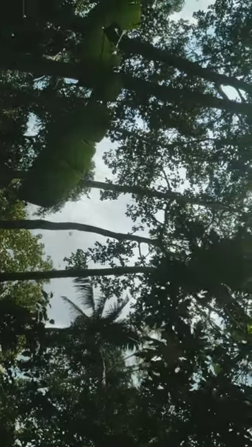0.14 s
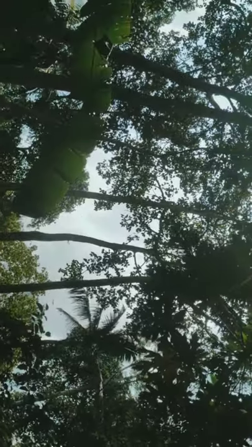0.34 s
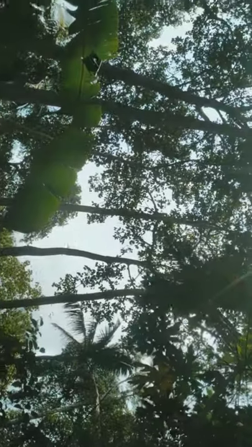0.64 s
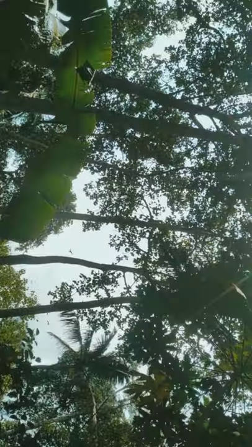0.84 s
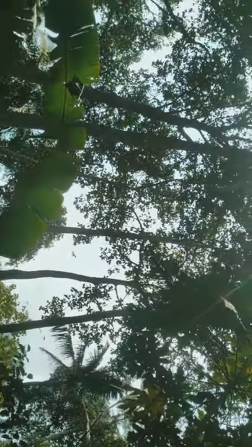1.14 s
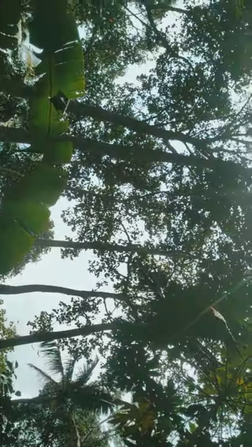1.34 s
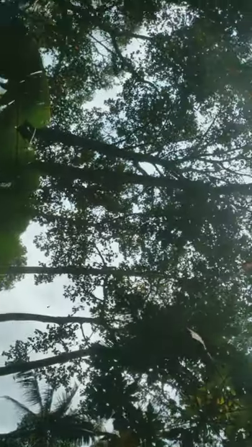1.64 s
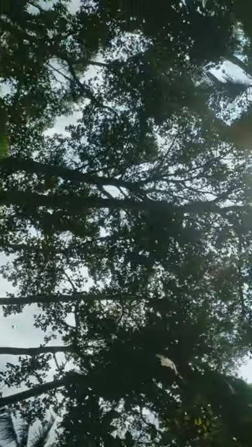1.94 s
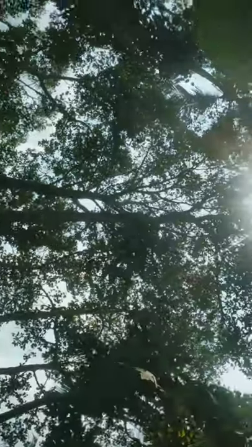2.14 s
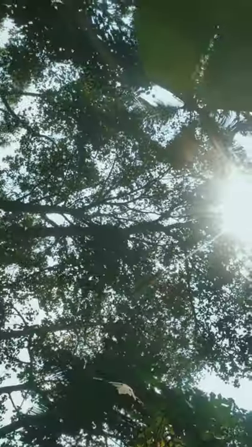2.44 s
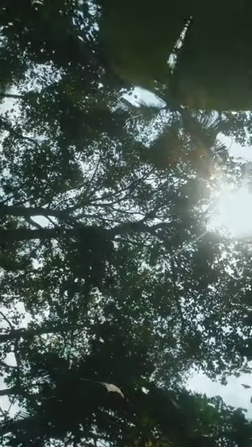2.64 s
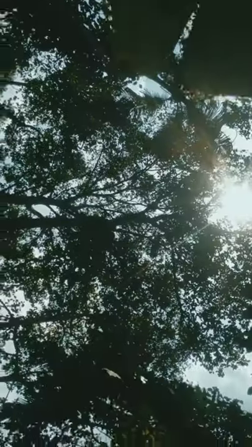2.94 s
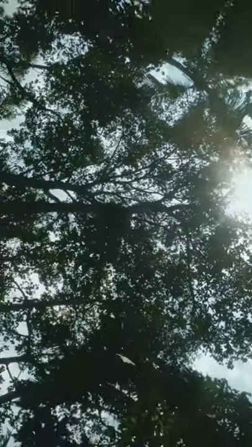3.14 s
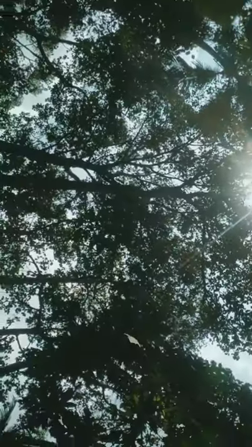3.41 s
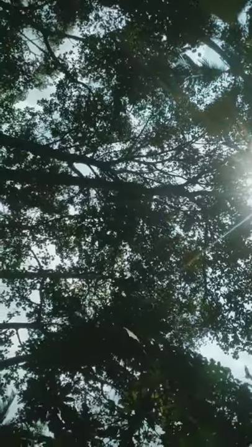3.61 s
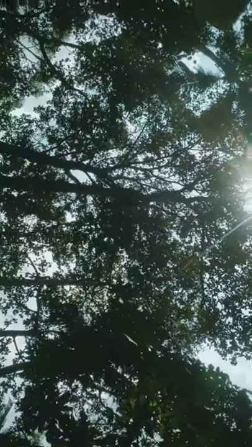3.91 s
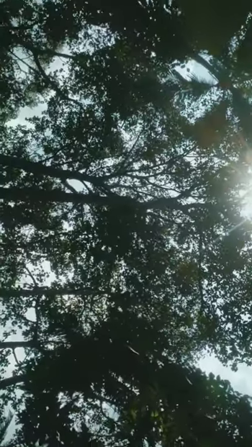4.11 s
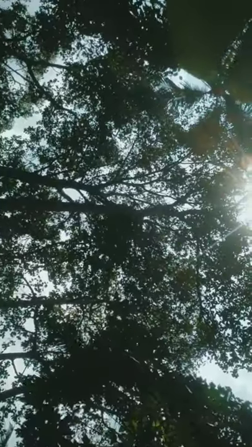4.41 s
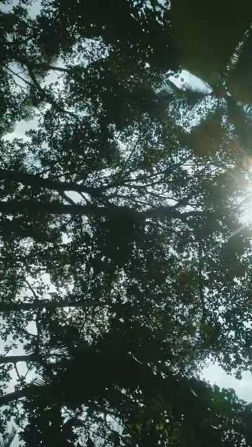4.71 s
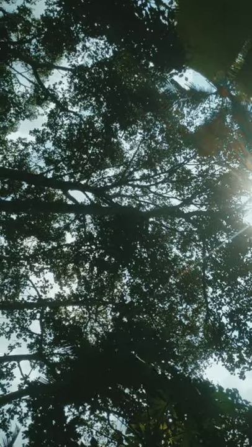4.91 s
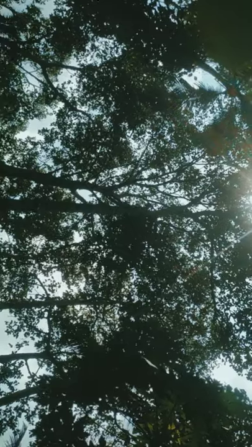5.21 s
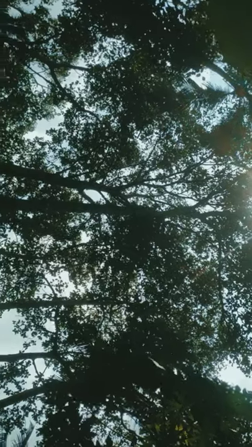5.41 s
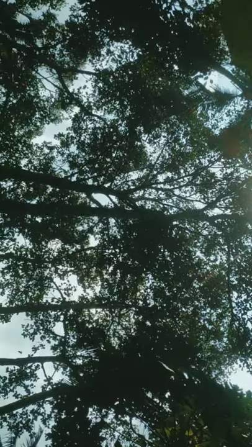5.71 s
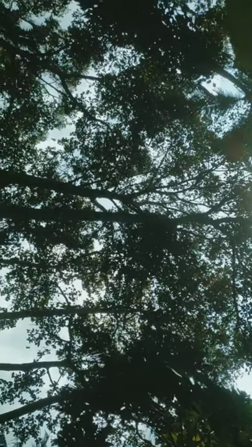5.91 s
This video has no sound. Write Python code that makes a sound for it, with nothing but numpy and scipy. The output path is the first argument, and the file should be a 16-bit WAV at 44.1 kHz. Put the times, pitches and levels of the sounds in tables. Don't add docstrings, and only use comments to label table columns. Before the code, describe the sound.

A huge colony of fruit bats screeches high in the trees, a steady hissing din, while someone steps softly on dry leaves close by.

```python
import sys
import numpy as np
from scipy import signal
from scipy.fft import rfft, irfft, next_fast_len
from scipy.io import wavfile
from scipy.ndimage import uniform_filter1d

SR = 44100
rng = np.random.default_rng(int(sys.argv[2]) if len(sys.argv) > 2 else 0)


def boost_factor(decibels):
    exponent = np.asarray(decibels, float) / 20
    return 10 ** exponent


def master_out(mix):
    frames = np.transpose(np.atleast_2d(mix))
    ceiling = np.clip(frames, -1, 1)
    pcm = np.round(ceiling * 32767).astype(np.int16)
    wavfile.write(sys.argv[1], SR, pcm)


N = 266892
T = np.arange(N) / SR
SIZE = next_fast_len(N, True)
HZ = np.arange(SIZE // 2 + 1) * SR / SIZE + 1e-3
PORT_GAP_M, SOUND_M_S = 0.1585, 343


def level(x, db):
    return x * boost_factor(db) / np.sqrt(np.mean(x ** 2))


def wave(spectrum):
    return irfft(spectrum, SIZE)[..., :N]


def shape(points):
    hz, db = np.transpose(points)
    return np.interp(np.log(HZ), np.log(hz), db)


def walk(rate, count):
    held = rng.standard_normal((count, int(N / SR * rate) + 2))
    held = np.repeat(held, 16, axis=1)
    slewed = 1.2 * uniform_filter1d(uniform_filter1d(held, size=16), size=16)
    return np.array([np.interp(T * rate * 16, np.arange(len(row)), row) for row in slewed])


def peak(s, rise_db_s, fall_db_s):
    return boost_factor(np.where(T < s, rise_db_s * (T - s), fall_db_s * (s - T)))


def ports(spectrum, lean):
    turn = np.exp(1j * np.pi * HZ * lean * PORT_GAP_M / SOUND_M_S)
    return np.array([spectrum / turn, spectrum * turn])


def voice(hz, rough, overtone_db):
    tremble = uniform_filter1d(rng.standard_normal(hz.shape), size=100) * 10
    phase = 2 * np.pi * np.cumsum(hz * (1 + rough * tremble), axis=-1) / SR
    return np.sin(phase) + boost_factor(overtone_db) * np.sin(2 * phase)


def crowd(count, share_db=-6.5):
    pitch = np.repeat(rng.uniform(-1, 1, (count, 41)), N // 40, axis=1)[:, :N]
    pitch = np.array([np.roll(row, k * 997) for k, row in enumerate(pitch)])
    hz = np.clip(4500 * 2 ** (0.75 * pitch + 0.022 * walk(8.0, count)), 1500, 8000)
    burst_db = 3 * np.clip(walk(22.0, count), -3, 1.5)
    calls = voice(hz, rough=0.02, overtone_db=-4.5) * boost_factor(burst_db)
    leans = rng.uniform(-1, 1, count)
    near = sum(ports(rfft(call, SIZE), lean) for call, lean in zip(calls, leans))
    alike = 0.92 * np.sinc(2 * HZ * PORT_GAP_M / SOUND_M_S)
    common, apart = rfft(rng.standard_normal((2, SIZE)))
    blur = np.sqrt(0.5 + alike / 2) * common + np.sqrt(0.5 - alike / 2) * apart * np.array([[1], [-1]])
    near_power = np.mean(np.abs(near[:, N // 16:N // 6]) ** 2)
    both = blur + near * boost_factor(share_db) * np.sqrt(N / near_power)
    return both / np.sqrt(uniform_filter1d(np.mean(np.abs(both) ** 2, axis=0), size=4000))


def colony(patchy_db=0.62, flicker_db=1.0):
    # t/s, effort/dB, shrillness/dB
    calling = [(0.0, -31.5, -3), (0.22, -31.5, -2), (0.34, -38, -4.5), (0.4, -34, -5), (1.09, -33.5, -2),
               (2.33, -34.5, -2.5), (2.44, -33.5, -2), (3.02, -36.5, -2.5), (3.86, -33, -2.5),
               (3.89, -34, -2.5), (3.99, -33, -1), (4.4, -33.5, -2.5), (4.45, -31, -2.5), (5.07, -34, -3),
               (5.14, -36.5, -5.5), (5.53, -36.5, -2), (5.64, -34, -1.5), (6.05, -37, -3.5)]
    # t/s, effort/dB
    deep_voices = [(0.0, -50), (0.54, -54.5), (0.77, -53.5), (0.99, -52), (1.41, -53.5), (1.75, -53),
                   (1.97, -52.5), (2.17, -51.5), (2.37, -52), (3.02, -51), (3.82, -51), (3.96, -50.5),
                   (4.52, -52), (4.7, -46.5), (5.32, -50), (6.05, -51)]
    # t/s, length/s, level/dB
    surges = [(0.093, 0.12, -1), (2.55, 0.075, 0), (4.02, .1, 1), (0.616, 0.028, 1), (0.73, 0.036, 2),
              (1.012, .06, 2), (1.294, 0.13, 1.5), (1.464, .08, -2), (1.964, .07, -2), (2.3, 0.049, -0.5),
              (2.635, 0.033, 1), (3.56, 0.069, -2.5), (3.898, .04, -2.5), (4.325, 0.034, -0.5),
              (4.8, .06, 1.5), (4.876, 0.03, -1), (5.837, 0.067, 3)]
    # f/Hz, level/dB per Hz
    din_colour = [(15, -46), (25, -5), (61, -12), (216, -19.5), (1120, -16.5), (1250, -16), (1550, -11),
                  (1870, -12.5), (3290, 1), (6280, -2), (9660, -7.5), (10800, -10.5), (12300, -13),
                  (14100, -18.5), (15700, -11.5)]
    # f/Hz, left minus right/dB
    left_lean = [(60, -0.5), (110, 0.5), (200, 2.5), (380, -1), (700, 0), (1290, 2), (2380, 2),
                 (4400, -2.5), (8120, -1), (15000, 1)]
    region_hz = (500, 1500, 3700, 6600, 11000)
    effort_share = (0.037, 0.033, 1.05, 0.7, 0.5)
    shrill_share = (.01, 0.34, -0.55, 0.89, .8)
    deep_share = (0.36, 1.2, 0.052, .01, .01)

    s, effort_db, shrill_db = np.transpose(calling)
    low_s, low_db = np.transpose(deep_voices)
    effort = np.interp(T, s, effort_db - effort_db.mean())
    effort = effort + sum(db * np.exp(-((T - at) / length) ** 2 * 2) for at, length, db in surges)
    shrill = np.interp(T, s, shrill_db - shrill_db.mean())
    deep = np.interp(T, low_s, low_db - low_db.mean())

    tilt = shape(left_lean) / 2
    din = crowd(count=16) * boost_factor(shape(din_colour) + np.array([tilt, -tilt]))
    body = wave(din * (HZ > 2600) * (HZ < 5200))
    din = din * boost_factor(-33) / np.sqrt(np.mean(body ** 2))

    octaves = np.arange(4.5, 14.6, 0.5)
    swell = walk(4.0, len(octaves))
    swell = (swell + np.roll(swell, 1, axis=0)) * patchy_db
    swell = swell + flicker_db * walk(11.0, len(octaves))
    swell = swell + 0.35 * walk(10, count=1)
    out = 0
    for octave, own_db in zip(octaves, swell):
        window = np.clip(1 - 2 * np.abs(np.log2(HZ) - octave), 0, 1)
        db = np.interp(octave, np.log2(region_hz), effort_share) * effort
        db = db + np.interp(octave, np.log2(region_hz), shrill_share) * shrill
        db = db + np.interp(octave, np.log2(region_hz), deep_share) * deep
        db = db - 2 * (octave < 10)
        db = db + own_db * (1.7 if octave < 11 else 1)
        out = out + wave(din * window) * boost_factor(db)
    return out


def near_bats(calls, glide, rough, overtone_db):
    out = np.zeros((2, N))
    for s, length, hz, db, pan_db in calls:
        i, n = int(s * SR), int(length * SR)
        throb = boost_factor(1.6 * walk(24.3, count=1)[0, :n])
        call = voice(hz * np.linspace(1, 1 + glide, n), rough, overtone_db - 40 * (hz > 8000))
        call = level(call * throb * signal.windows.tukey(n, 0.45), db)
        lag = int(8 * np.tanh(pan_db / 4.0))
        out[0, i:i + n] += call * boost_factor(pan_db / 2)
        out[1, i + lag:i + lag + n] += call * boost_factor(-pan_db / 2)
    return out


def nearer_animals():
    # t/s, length/s, f/Hz, level/dB, left minus right/dB
    squeals = [(.08, .19, 2852, -47, 10), (.1, .05, 8530, -49, -6), (.75, 0.14, 13000, -49, 5),
               (1.36, .11, 7122, -50, -5.5), (1.5, 0.17, 6400, -44, -4), (1.68, .14, 6540, -49, -4.5),
               (1.93, 0.207, 6640, -46, -2), (2.12, 0.28, 6480, -48.5, -2.5), (3.14, 0.53, 6980, -45, -1.5),
               (3.74, .13, 3480, -47, 2.5), (4.12, .07, 8900, -52, -2), (4.6, 0.33, 11800, -52, 3),
               (5.98, 0.063, 3400, -40, -5)]
    # t/s, length/s, f/Hz, level/dB, left minus right/dB
    screeches = [(.62, 0.27, 11000, -48, 3.5), (.95, 0.17, 12850, -45, 2), (.95, 0.23, 11940, -51, 6),
                 (.97, 0.12, 10610, -46, 3), (1.2, .16, 12460, -48, 5), (1.22, 0.19, 10200, -55, 9),
                 (1.5, 0.42, 12870, -46.5, 3.5), (2.4, 0.3, 13600, -52.5, 0.5),
                 (2.78, 0.14, 12100, -49, -2), (3.3, .25, 11200, -59, -4), (3.3, .18, 5945, -42.5, 0.5),
                 (3.46, 0.19, 4200, -40.5, -2), (3.62, 0.13, 4110, -43, 0), (3.74, 0.14, 4300, -44, -2),
                 (3.65, 0.2, 6000, -39.5, 1.5), (3.95, .16, 3720, -44, 1), (4.06, .21, 7420, -44, 0.5),
                 (4.33, .25, 9100, -45.5, 0), (4.92, .1, 8550, -48, 4), (5.5, .33, 10180, -46.5, -0.5)]
    # t/s, length/s, f/Hz, level/dB, left minus right/dB
    squawks = [(.05, .2, 2000, -56, 4), (.88, .2, 1670, -55, -3.5), (1.5, 0.11, 1650, -52.5, 6),
               (1.66, 0.087, 1552, -52.5, 5), (2.22, 0.2, 1300, -55, -3), (2.38, .16, 1500, -51.5, -1),
               (2.78, 0.26, 1248, -56, -3), (2.82, .2, 1710, -54, -0.5), (3.3, 0.19, 1385, -56, -3.5),
               (4.2, .1, 1447, -56, -1), (4.81, 0.08, 880, -51, 4)]
    near = near_bats(squeals, glide=-0.015, rough=0.015, overtone_db=-9.0)
    near = near + near_bats(screeches, glide=0.01, rough=0.045, overtone_db=-13.5)
    near = near + near_bats(squawks, glide=0.0098, rough=0.14, overtone_db=-17.0)
    decay_s, echo_db = 0.053, 0.5
    tail = rng.standard_normal((2, 8000)) * np.exp(-np.arange(8000) / (decay_s * SR))
    tail = boost_factor(echo_db) * tail / np.sqrt(np.sum(tail[0] ** 2))
    return near + signal.fftconvolve(near, tail, axes=1)[:, :N]


def steps(grains_per_s=4600.0, scatter_db=2.5):
    # t/s of the peak, length/s, crunch/dB, grit/dB, leaf rustle/dB
    presses = [(.082, 0.035, -59, -48, -51), (.184, 0.084, -48.5, -41, -34), (.436, 0.017, -51, -39, -52),
               (0.832, 0.03, -44.5, -50, -55), (1.19, 0.035, -49, -57, -52), (1.253, 0.028, -52, -58, -52),
               (1.647, 0.054, -45.5, -40.5, -52), (2.38, 0.1, -47, -39.5, -57),
               (3.065, 0.11, -46.5, -43, -34), (3.774, 0.035, -47.5, -49, -48),
               (3.972, .11, -41, -42.5, -33.5), (4.065, .04, -50, -66, -51.5),
               (4.578, 0.085, -49.5, -41, -50), (4.733, 0.11, -43, -41.5, -36),
               (4.805, 0.07, -51, -39, -35), (4.88, .06, -53, -59, -54), (5.652, 0.073, -45, -38, -50),
               (5.856, .06, -49.5, -49, -56)]
    # f/Hz, level/dB per Hz
    crunch_colour = [(71, -51), (120, -5.5), (318, -3), (392, -3.5), (458, -2), (734, -3), (1200, -6.5),
                     (1560, -25), (2640, -70)]
    grit_colour = [(900, -22.5), (1500, -4.5), (2100, 1), (3500, -16.5)]
    rustle_colour = [(4000, -35), (7000, 1), (10000, 10), (15500, 11)]
    press_db, lift_db = 18.5, 15.5

    cracks = (rng.random((4, N)) < grains_per_s / SR) * rng.standard_normal((4, N))
    cracks = cracks * boost_factor(scatter_db * rng.exponential(size=(4, N)))
    cracks = rfft(cracks + 0.37 * rng.standard_normal((4, N)), SIZE)
    crunch = level(wave(ports(cracks[0], -0.53) * boost_factor(shape(crunch_colour))), -2.2)
    grit = level(wave(ports(cracks[1], 0.25) * boost_factor(shape(grit_colour))), 0)
    rustle = level(wave(cracks[2:] * boost_factor(shape(rustle_colour))), 0)
    out = 0
    for s, length, crunch_db, grit_db, rustle_db in presses:
        weight = peak(s, press_db / length, lift_db / length)
        out = out + weight * (crunch * boost_factor(crunch_db) + grit * boost_factor(grit_db) + rustle * boost_factor(rustle_db))
    return out


def thuds(cycles=5.3):
    # t/s, peak level/dB, f/Hz
    knocks = [
        (0.073, -45, 285),
        (1.088, -41.5, 1170),
        (1.181, -57, 67.3),
        (1.65, -38, 842),
        (4.069, -46, 72.7),
        (4.741, -39, 154),
        (4.815, -29, 980),
        (5.238, -39, 960),
        (5.604, -38, 700),
        (5.643, -30.5, 650),
    ]
    out = 0
    for s, db, hz in knocks:
        t = np.clip(T - s, 0, 1)
        swell = (1 - np.exp(-t * hz * 4.3)) * np.exp(-t * hz / cycles)
        out = out + boost_factor(db - 5.0) * np.sin(2 * np.pi * hz * t) * swell * (T < s + 1)
    return out


def wind(buffet_db=0.0):
    # t/s, level/dB, left minus right/dB
    breeze = [(0.0, -49.5, 15), (.23, -55, 5), (.45, -52.5, 16), (.72, -62, 4), (.94, -53, 6),
              (1.03, -48.5, 9), (1.18, -57, -1), (1.29, -60, 12), (1.51, -54, 4), (1.8, -53, 4),
              (3.17, -54, 3), (4.08, -51, 20), (4.2, -62, -5), (5.05, -61, 1), (5.46, -54, 13.5),
              (5.81, -61, -6)]
    # f/Hz, level/dB per Hz
    rumble_colour = [(15, 0.5), (40, 3), (90, -6), (300, -22.5), (900, -40.5)]
    rise_db_s, fall_db_s, calm_db = 135, 119, -65.5
    eddies = rfft(rng.standard_normal((2, SIZE)))
    eddies = level(wave(eddies * boost_factor(shape(rumble_colour))), -4.5)
    gain = boost_factor(calm_db)
    for s, db, pan_db in breeze:
        gain = gain + peak(s, rise_db_s, fall_db_s) * boost_factor(db + pan_db * np.array([[0.5], [-0.5]]))
    return eddies * gain * boost_factor(buffet_db * walk(27.0, count=2))


def scene():
    return colony() + nearer_animals() + steps() + thuds() + wind()


def top_cut(x):
    return signal.sosfilt(signal.butter(12, 15890, fs=SR, output="sos"), x)


def record(dry):
    return top_cut(dry)


dry = scene()
out = record(dry)
master_out(out)
```